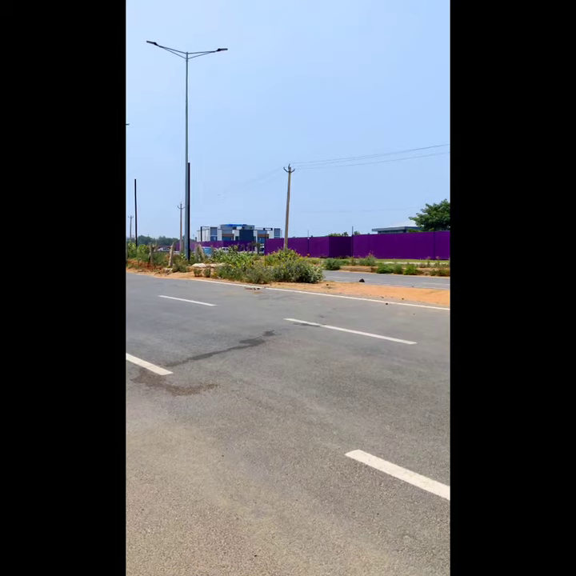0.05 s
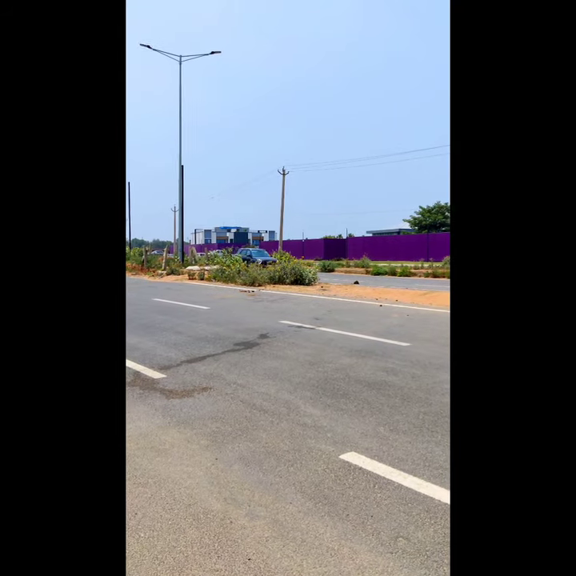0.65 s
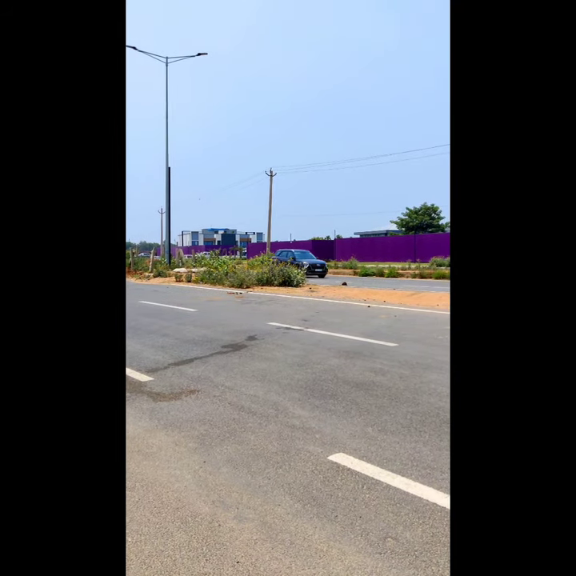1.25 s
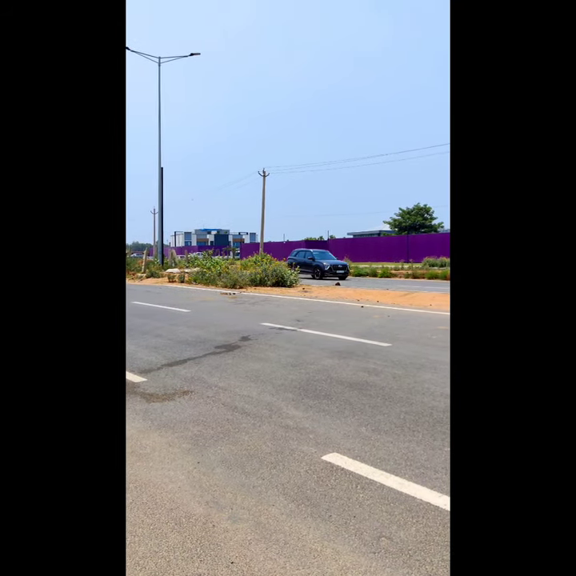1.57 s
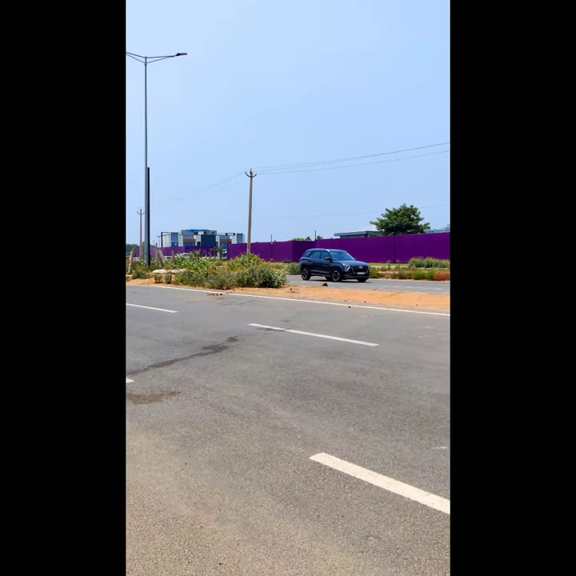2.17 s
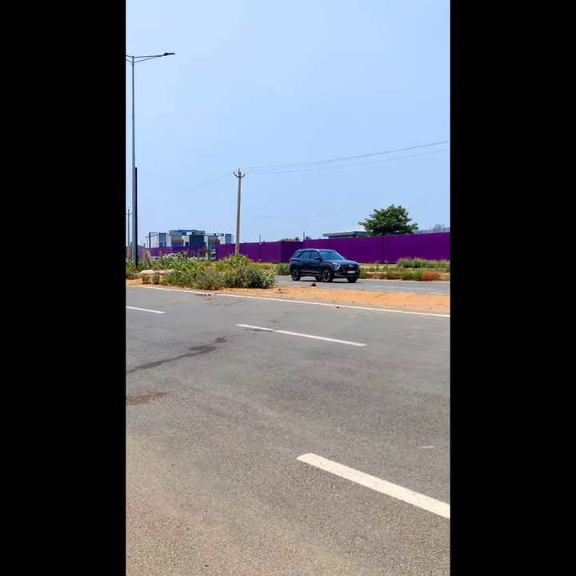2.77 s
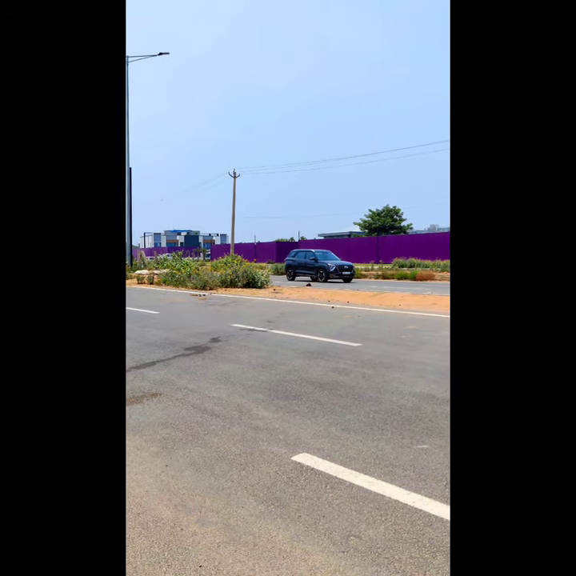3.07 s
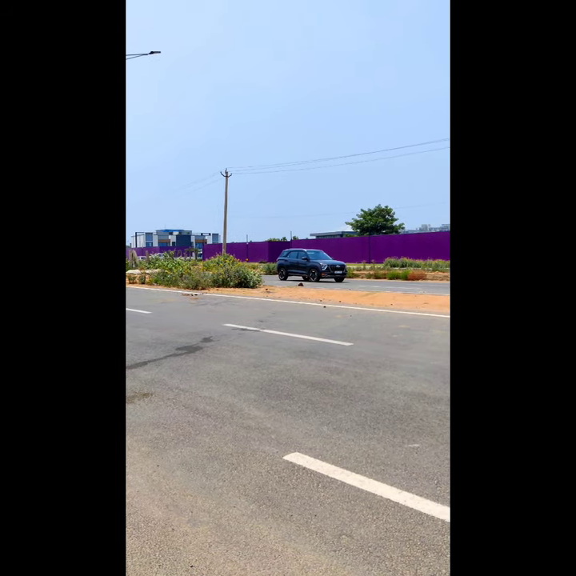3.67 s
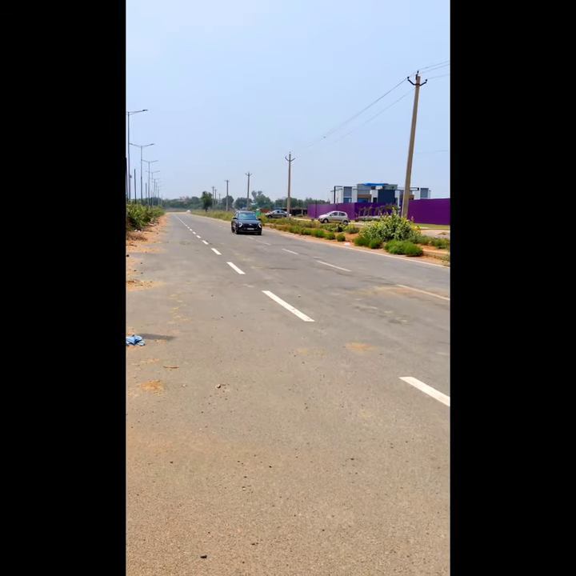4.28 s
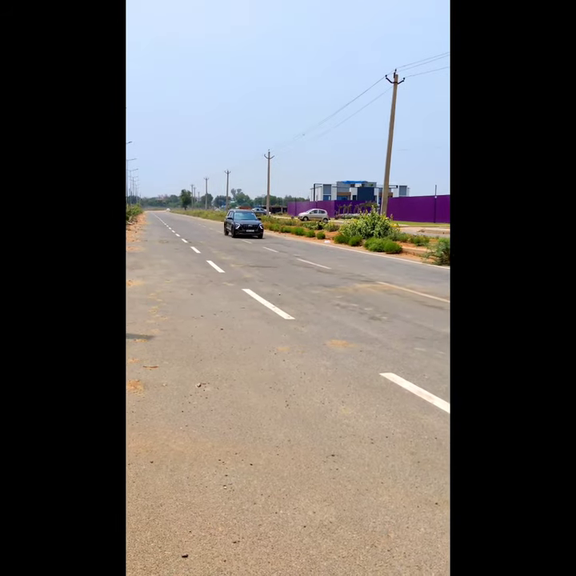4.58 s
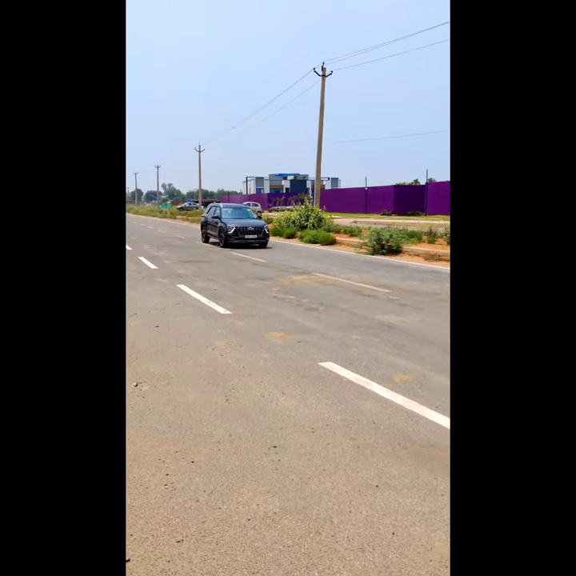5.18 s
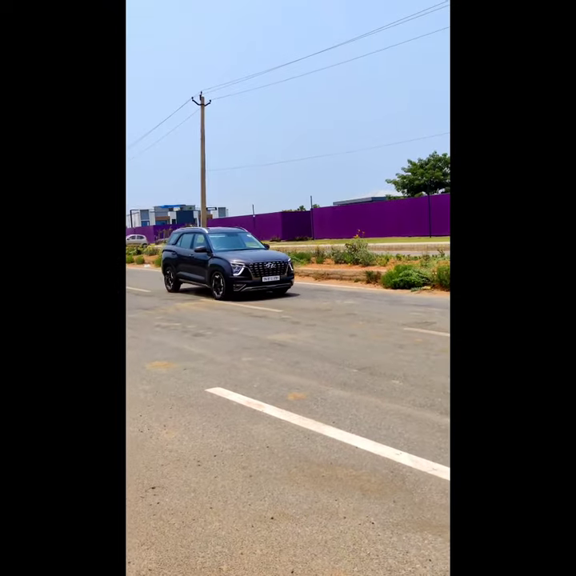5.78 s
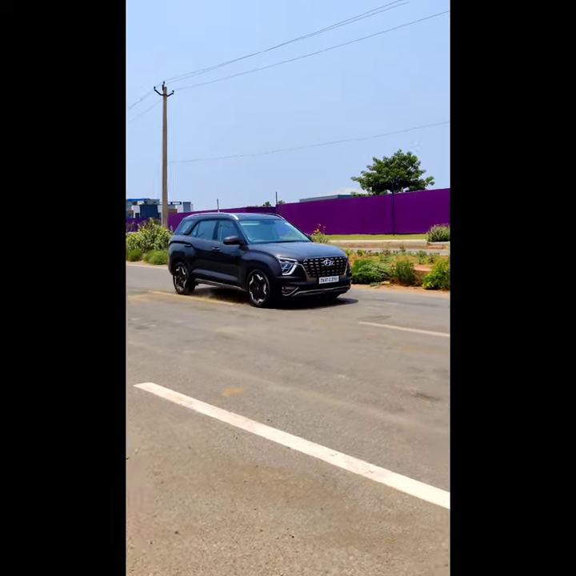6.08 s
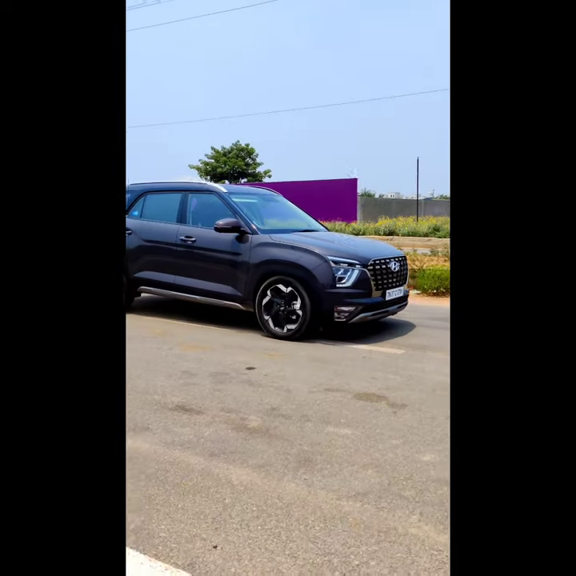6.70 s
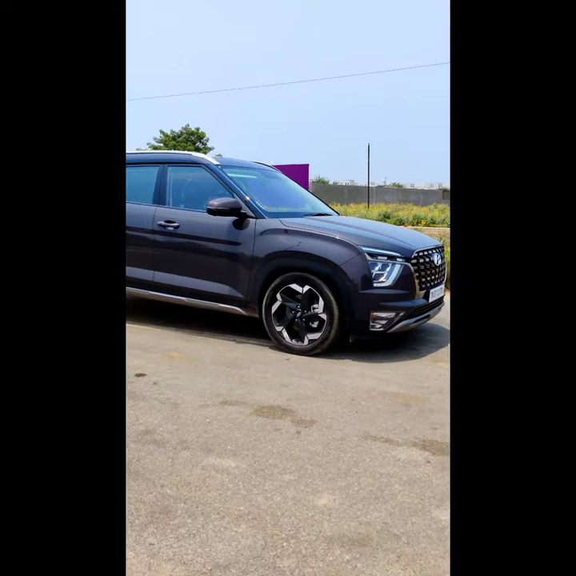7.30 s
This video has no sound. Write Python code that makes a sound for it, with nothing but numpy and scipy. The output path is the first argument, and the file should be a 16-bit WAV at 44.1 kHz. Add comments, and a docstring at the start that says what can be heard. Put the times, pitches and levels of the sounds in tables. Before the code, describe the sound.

Outdoors, with a light breeze on the microphone, tyres screech in uneven surges as a distant car brakes. The squeal stops briefly, leaving a low engine drone, soft scuffs and faint bird chirps. A second, rougher screech follows and draws near, creeping up in pitch while the engine slows. Faint grit crackles under the tyres and the wheels shudder as the car comes close.

```python
"""Tyres squeal as a car brakes hard twice on an open road, first far off, then rolling up close.
Stick-slip friction drives the tread near 800 Hz, surging at each grab of the brakes, while sliding
rubber rasps and hisses on the asphalt. In the second stop the engine note sinks, grit crackles and
the wheels judder. Between the stops the far engine growls and a small bird chirps over faint scuffs.
A light breeze rumbles on the two-port microphone that hears it all."""
import sys
import numpy as np
from scipy import signal
from scipy.fft import rfft, irfft, next_fast_len
from scipy.io import wavfile
from scipy.ndimage import uniform_filter1d, minimum_filter1d, map_coordinates

SR = 44100
rng = np.random.default_rng(int(sys.argv[2]) if len(sys.argv) > 2 else 0)


def store_pcm(level_fs):
    """Save levels as 16-bit WAV."""
    pcm = np.round(np.clip(level_fs, -1, 1) * 32767).astype(np.int16)
    wavfile.write(sys.argv[1], SR, np.atleast_2d(pcm).T)


N = 328545
TIME = np.arange(N) / SR
CLOCK = TIME[::64]  # coarse time for envelopes
START_S, SECOND_RUN_S = .078, 4.13


def undb(db):
    """Amplitude ratio of a level in decibels."""
    return np.exp(np.asarray(db) * (np.log(10) / 20))


def unit(x):
    """Normalisation to rms 1."""
    return x / np.sqrt(np.mean(np.abs(x) ** 2))


def curve(rows):
    """Linear interpolation, with rounded corners, of each column that follows time_s."""
    time_s, *columns = np.transpose(rows)
    return [uniform_filter1d(np.interp(TIME, np.sort(time_s), c), size=256) for c in columns]


def wander(hz):
    """Random modulation: noise of rms 1, low-passed at hz."""
    count = 32768
    freq = np.fft.rfftfreq(count, TIME[-1] / count)
    smooth = irfft(rfft(rng.standard_normal(count)) / (1 + (freq / hz) ** 2))
    return unit(np.interp(TIME, np.linspace(0, TIME[-1], count), smooth))


def gate(start, end, edge):
    """Trapezoidal window, with all times in seconds."""
    out, span = np.zeros(N), slice(max(int(start * SR), 0), int(end * SR))
    out[span] = np.clip((TIME[span] - start) / edge, 0, 1) * np.clip((end - TIME[span]) / edge, 0, 1)
    return out


def place(x, balance_db):
    """Amplitude panning by a level difference, left minus right."""
    return x * undb(np.array([balance_db, -balance_db]).reshape(2, -1) / 2)


def noise(spectrum, side_db, balance=((100, 0), (1000, 0))):
    """Partly coherent stereo noise of rms 1, falling 60 dB an octave beyond the ends of its spectrum."""
    size = next_fast_len(N)
    octave = np.log2(np.fft.rfftfreq(size, 1 / SR) + 1)
    hz, db = np.transpose(spectrum)
    beyond = np.abs(octave - np.clip(octave, np.log2(hz[0]), np.log2(hz[-1])))
    colour = undb(np.interp(octave, np.log2(hz), db) - 60 * beyond)
    mid, side = rfft(rng.standard_normal((2, size))) * colour
    port_hz, port_db = np.transpose(balance)
    balance_db = np.interp(octave, np.log2(port_hz), port_db)
    pair = place(mid + undb(side_db) * np.array([side, -side]), balance_db)
    return unit(irfft(pair, size)[:, :N])


# Still air over the fields: frequency_hz, density_db
AIR_SPECTRUM = [(650, -37), (1100, 1), (1460, -4.5), (2040, -2), (2150, -9), (2670, -12.5), (3700, -12.5),
                (4760, -15.5), (5270, -18), (6120, -17), (8140, -27.5), (10600, -54.5), (17900, -120)]

def air():
    """Ambient noise floor: a faint broadband hiss whose level drifts."""
    return undb(-57.5 + .8 * wander(4)) * noise(AIR_SPECTRUM, side_db=.5)


# Breeze on the microphone: time_s, level_db
BREEZE_LEVEL = [(.1, -37.5), (2.3, -42.5), (2.8, -36), (3.9, -37), (4.08, -23.5), (4.2, -46), (4.7, -40),
                (6.6, -32), (7.1, -28.5), (7.45, -27)]
# Its spectrum: frequency_hz, density_db
BREEZE_SPECTRUM = [(14, -7.5), (22, 6.5), (35, 1), (50, 3), (70, -8)]

def breeze():
    """Turbulent pressure: slow eddies reach each port partly on their own."""
    eddies = noise(BREEZE_SPECTRUM, side_db=-5, balance=[(20, -3), (70, -1)])
    return undb(curve(BREEZE_LEVEL)[0]) * eddies


# Bird chirps: start_s, first_pitch_hz, last_pitch_hz, level_db
CHIRPS = [(2.805, 4230, 4470, -69), (2.835, 4720, 4450, -71), (2.863, 5460, 4570, -57.5),
          (2.925, 3730, 3230, -65), (3.115, 4650, 4500, -69), (3.143, 5530, 4600, -58),
          (3.2, 3700, 3120, -63), (3.42, 5520, 4700, -61), (3.47, 3720, 3600, -68),
          (3.685, 4520, 4505, -70), (3.715, 5510, 4480, -58), (3.775, 3780, 3250, -66),
          (3.845, 4820, 4550, -69), (3.92, 4050, 4350, -67), (3.95, 4300, 4200, -70)]
# Softer twitter among them: time_s, level_db
TWITTER_LEVEL = [(3.2, -85), (3.38, -67), (3.52, -81), (3.65, -69), (3.8, -77), (3.96, -73), (4.06, -87)]

def bird():
    """Frequency-modulated whistles; scattering from bushes and fence adds an exponential tail."""
    chirp_s, scatter_decay_s, scatter_db = .037, .035, -2.5
    song = np.zeros(N)
    t = TIME[:int(chirp_s * SR)]
    fade = np.clip(np.minimum(t, chirp_s - t) / .008, 0, 1)
    waver = 1 + .01 * wander(200)
    for start, first_hz, last_hz, db in CHIRPS:
        span = slice(int(start * SR), int(start * SR) + len(t))
        hz = (first_hz + (last_hz - first_hz) * (t / chirp_s) ** 2) * waver[span]
        song[span] += undb(db) * fade * np.sin(2 * np.pi * np.cumsum(hz) / SR)
    twitter_hz = (4250 + 200 * wander(30)) * waver
    twitter_gain = undb(curve(TWITTER_LEVEL)[0]) * np.clip(wander(30) + .4, 0, 1)
    song += twitter_gain * np.sin(2 * np.pi * np.cumsum(twitter_hz) / SR)
    count = 8192
    decay = np.exp(-TIME[:count] / scatter_decay_s)
    tail = unit(rng.standard_normal((2, count)) * decay) / np.sqrt(count)
    return song + undb(scatter_db) * signal.fftconvolve(song[None], tail, axes=1)[:, :N]


# Scuffs in the lull: centre_s, length_s, low_hz, high_hz, level_db
SCUFFS = [(2.909, .11, 2600, 4200, -56), (3.099, 0.21, 2980, 5000, -59.5), (3.648, .12, 2800, 5000, -63)]

def scuffs():
    """Band-limited noise, swelling and fading under triangular envelopes."""
    out = np.zeros((2, N))
    for centre, length, low_hz, high_hz, db in SCUFFS:
        start, count = int((centre - length / 2) * SR), int(length * SR)
        band = signal.butter(2, [low_hz, high_hz], "bandpass", fs=SR, output="sos")
        mid, side = signal.sosfilt(band, rng.standard_normal((2, count)))
        scuff = unit(mid + undb(-3) * np.array([side, -side]))
        out[:, start:start + count] += undb(db) * np.bartlett(count) * scuff
    return out


# Drone of the distant car, and roll of the near tyres: time_s, level_db
DRONE_LEVEL = [(.1, -29), (.6, -33), (1.2, -29.5), (1.6, -35.5), (2.1, -30.5), (2.55, -34.5), (2.7, -27.5),
               (3.2, -30), (3.45, -31.5), (3.62, -36), (3.82, -32.5), (4.12, -33.5)]
NEAR_ROLL_LEVEL = [(4.15, -34.5), (4.6, -34.5), (5.1, -38.5), (5.7, -34.5), (6.2, -38.5), (7.0, -32.5),
                   (7.45, -39.5)]
# Spectra of the drone, the far tyres and the near tyres: frequency_hz, density_db
DRONE_SPECTRUM = [(65, -47.5), (110, -3), (183, 0.5), (231, -9.5), (300, -1.5), (358, -8), (396, -15),
                  (464, -9.5), (550, -21), (614, -14.5), (692, -23), (846, -36.5), (898, -28.5),
                  (925, -30.5), (1200, -46.5), (1560, -82.5), (2640, -120)]
FAR_ROLL_SPECTRUM = [(550, -8), (800, 6), (1000, -14), (1300, -19.5), (1700, -18), (2400, -28)]
NEAR_ROLL_SPECTRUM = [(140, 8), (175, 10.5), (220, 7), (275, -3.5), (330, -2), (400, -9.5), (520, -7),
                      (620, 2), (780, 2), (1050, -5.5), (1400, -12), (1900, -20), (2500, -31)]

def road(near):
    """Rolling contact radiates broadband noise; near (0 to 1) crossfades from the far run to the close."""
    drone = undb(curve(DRONE_LEVEL)[0]) * noise(DRONE_SPECTRUM, side_db=-10)
    far_db = np.interp(TIME, [.3, 2.4, 3.1, 4.1], [-36, -38, -44, -55.5])
    far_roll = undb(far_db) * noise(FAR_ROLL_SPECTRUM, side_db=2)
    near_roll = undb(curve(NEAR_ROLL_LEVEL)[0]) * noise(NEAR_ROLL_SPECTRUM, side_db=-22)
    return (1 - near) * (drone + far_roll) + near * near_roll


# Far engine, dying down under braking and picking up as the car turns: time_s, firing_hz, level_db
GROWL = [(.15, 140, -32.5), (.5, 142, -42), (.85, 143, -34.5), (1.25, 148.2, -39), (1.6, 150, -50),
         (2.55, 152, -49.5), (2.7, 154.7, -32.5), (2.76, 152.8, -31), (2.82, 152.3, -28.5),
         (2.92, 145.7, -31.5), (3.02, 155.5, -29.5), (3.1, 159.5, -36), (3.18, 166.8, -30),
         (3.3, 161.4, -35.5), (3.4, 158, -43.5), (3.62, 149.7, -46), (3.8, 159.8, -36.5), (4.0, 159.6, -48),
         (4.1, 161.5, -32), (4.14, 160, -41.5)]
# Its harmonics: order, relative_db
GROWL_ORDERS = [(1, -2.5), (2, 0.5), (3, -4.5), (4, -16.5)]

def far_engine():
    """Uneven firings give a rough harmonic series whose orders flutter in level and phase on the way."""
    hz, db = curve(GROWL)
    phase = 2 * np.pi * np.cumsum(hz * (1 + .03 * wander(39))) / SR
    note = sum(undb(order_db + 3.5 * wander(40)) * np.sin(order * phase + .6 * wander(35))
               for order, order_db in GROWL_ORDERS)
    return undb(db) * unit(note)


# Near engine on the overrun: time_s, firing_hz
ENGINE_RATE = [(4.13, 172), (4.5, 158), (5.0, 138.5), (5.4, 128), (6.0, 121), (6.5, 119), (7.0, 116),
               (7.45, 113)]
# Its strength: time_s, level_db
ENGINE_LEVEL = [(4.13, -37.5), (4.65, -30.5), (5.1, -33.5), (5.6, -34.5), (6.2, -31), (6.8, -32),
                (7.2, -31), (7.45, -28)]
# Its harmonics: order, relative_db
ENGINE_ORDERS = [(1, -3), (2, -16.5), (3, -24.5), (4, -18), (5, -22.5)]

def near_engine():
    """Harmonics of the firing rate sink as the car slows; upper orders and mutter emerge close by."""
    phase = 2 * np.pi * np.cumsum(curve(ENGINE_RATE)[0] * (1 + .024 * wander(42.6))) / SR
    muffle_db = np.interp(TIME, [5.5, 6.3], [-13, 0])
    note = sum(undb(db + 2.4 * wander(48) + (order > 2) * muffle_db) * np.sin(order * phase)
               for order, db in ENGINE_ORDERS)
    puffs = unit(1 + .45 * np.cos(phase))  # one puff of noise per firing
    breath = noise([(180, -9.5), (330, -2), (650, -2.5)], side_db=-12.5)
    mutter = undb(2.4 * muffle_db - 11.5) * puffs * breath
    return (unit(note) + mutter) * undb(curve(ENGINE_LEVEL)[0])


# Rumble of wheels and suspension: time_s, level_db
RUMBLE_LEVEL = [(.1, -39), (2.3, -33), (2.8, -40), (4.3, -40.5), (4.8, -39.5), (5.6, -41.5), (6.4, -34.5),
                (6.9, -31), (7.3, -32.5), (7.45, -49.5)]
# Its spectrum: frequency_hz, density_db
RUMBLE_SPECTRUM = [(45, -9), (62, -9), (79, 0.5), (100, -6), (120, -6)]
# Judder as the brakes grab: centre_s, pitch_hz, length_s, level_db
JUDDER = [(6.015, 206.8, 0.14, -30.5), (6.325, 81.1, 0.14, -33), (6.49, 81.26, .08, -27),
          (6.569, 79, 0.1, -26.5), (6.838, 146, 0.12, -30.5), (6.879, 77.14, 0.23, -25.5),
          (6.981, 164.8, 0.12, -23.5), (7.078, 81, 0.14, -24), (7.216, 135, 0.05, -23.5),
          (7.263, 174.4, 0.13, -27)]

def wheels(rasp_gain):
    """Forced vibration: rolling and each skid shake the suspension, which shudders near the stop."""
    gain = np.hypot(undb(curve(RUMBLE_LEVEL)[0]), undb(-9) * rasp_gain)
    out = gain * noise(RUMBLE_SPECTRUM, side_db=-30.5)
    uneven_time = np.cumsum(1 + .07 * wander(40)) / SR
    for centre, hz, length, db in JUDDER:
        span = slice(int((centre - length / 2) * SR), int((centre + length / 2) * SR))
        shudder = np.sin(2 * np.pi * hz * uneven_time[span])
        window = 2 * np.bartlett(len(shudder))  # mean of 1
        out[:, span] += undb(db) * window * shudder
    return out


# Grit crunching under the tread: time_s, level_db
GRIT_LEVEL = [(5.0, -88.5), (5.6, -74), (6.0, -75.5), (6.8, -68), (7.45, -61.5)]
# Its spectrum: frequency_hz, density_db
GRIT_SPECTRUM = [(6000, 5), (8000, 4), (10500, 1), (12000, -4), (14000, -14.5), (15000, -19.5)]

def grit():
    """Impulsive noise: sand crackles under the near tyres and two stones snap out."""
    crackle = unit(undb(5 * wander(500) + 3 * wander(8)))
    snaps = sum((TIME > start) * np.exp(-np.abs(TIME - start) / .003) for start in (5.25, 6.648))
    stone_db = np.interp(TIME, [5.2, 6.6], [-63, -53])  # louder as the car nears
    envelope = undb(curve(GRIT_LEVEL)[0]) * crackle + undb(stone_db) * snaps
    return envelope * noise(GRIT_SPECTRUM, side_db=-1)


# Instants at which the tyre bites: centre_s, half_width_s, depth_db
BITES = [(0.521, 0.0072, -14), (0.69, 0.0096, -11.5), (0.95, 0.0041, -15.5), (1.513, 0.01, -16.5),
         (2.198, .01, -6.5), (4.539, 0.0091, -6), (5.241, 0.012, -3), (5.515, .012, -4), (6.372, 0.011, -9),
         (6.866, 0.017, -9)]

def choke():
    """A moment of grip interrupts stick-slip: Gaussian dips in the level of the squeal."""
    centre, half_width, db = np.transpose(BITES)[:, :, None]
    dips_db = np.sum(db * np.exp(-((CLOCK - centre) / half_width) ** 2), axis=0)
    return np.interp(TIME, CLOCK, undb(dips_db))


# Skids of the leading tyre, one per grab of the brakes:
# start_s, length_s, pitch_hz, glide_hz, squeal_db, roughness, rasp_level_db, hiss_level_db
GRABS = [ (0.057, 0.126, 768, 1, -14.5, 0.98, -29.5, -45.5),
         (0.188, .035, 754, -1, -11.5, 0.74, -30, -53.5), (0.462, 0.16, 739, 2.5, -17, 0.6, -41, -60.5),
         (0.636, 0.046, 757, 2, -14.5, 0.53, -32, -51.5), (0.698, .13, 759, -1.5, -12.5, 0.56, -40, -51),
         (0.826, .115, 758.5, 9.5, -11, 0.33, -34.5, -53), (0.947, 0.15, 754.4, 3, -15, 0.48, -39.5, -53),
         (1.199, 0.056, 775.7, -1.5, -16.5, 0.34, -41, -52.5),
         (1.274, 0.05133, 906, 21, -19.5, 0.4, -32.5, -44),
         (1.322, 0.03045, 849, -34, -10.5, 0.24, -28.5, -45),
         (1.352, 0.051, 771, -2, -13, 0.41, -31.5, -49), (1.661, 0.06815, 778, 2, -15, 0.67, -37, -50),
         (1.961, 0.025, 748, -6, -15, 0.47, -36.5, -55), (1.993, 0.02487, 764.4, 0, -19, 0.36, -44, -66),
         (2.07, 0.1054, 830.5, 18.5, -17.5, 0.55, -38, -51.5),
         (2.205, 0.039, 788, -1, -21, 0.36, -45.5, -68), (2.443, 0.024, 795, 7.5, -22, 0.6, -47, -61),
         (2.466, 0.026, 845, 34.5, -15.5, 0.36, -35.5, -49.5),
         (4.419, .077, 755, -2, -12.5, 0.81, -26.5, -47.5),
         (4.645, .15, 746.3, 20.5, -12, 0.84, -25.5, -54),
         (4.785, .125, 795.5, 71.5, -13.5, 1.08, -25.5, -42.5),
         (4.974, .1, 837, -63.5, -14.5, 0.2, -46, -56), (5.065, 0.063, 757.8, -4, -11, 0.27, -30.5, -51),
         (5.134, 0.0919, 790.4, 13, -9.5, 1.12, -23, -40.5), (5.258, .13, 764.5, 1, -10, 0.45, -31.5, -52),
         (5.399, .056, 763, 1, -12, 0.78, -25, -41.5), (5.472, 0.037, 779.5, 0, -14, 0.94, -28.5, -47),
         (5.522, .135, 770.2, 3, -12.5, 0.68, -39, -66.5), (5.792, .16, 802, 0.5, -14.5, 0.82, -31, -42.5),
         (5.966, 0.056, 788.6, 32.5, -9, 0.63, -26.5, -40), (6.011, .098, 852, 8.5, -7.5, .6, -20.5, -35.5),
         (6.202, .09, 846.7, 7.5, -11.5, 0.62, -29, -38.5),
         (6.469, .082, 862.4, 9.5, -11.5, 0.84, -25, -37.5), (6.563, .1, 931, 48, -15, 0.14, -54.5, -48),
         (6.659, .07, 945, -42.5, -11, 0.1, -30.5, -36.5),
         (6.888, 0.069, 857, -40.5, -10, 0.55, -31.5, -40.5), (7.07, 0.05, 863.4, -3, -5, 0, -25.5, -39.5),
         (7.276, .042, 865.5, -2.5, -10, 0.23, -28, -41.5), ]
ATTACK_S, RELEASE_S = .0232, .016  # a squeal's rise time and decay time constant

def sum_grabs(values, attack_s=ATTACK_S, release_s=RELEASE_S):
    """Power summation: each grab's value is weighted by its squared rise, hold and decay."""
    start, length = np.transpose(GRABS)[:2, :, None]
    rise = np.clip(.5 + (CLOCK - start - ATTACK_S / 2) / attack_s, 0, 1)
    fall = np.exp(-np.clip((CLOCK - start - length + release_s - RELEASE_S) / release_s, 0, 20))
    return np.interp(TIME, CLOCK, np.sum(values * (rise * fall) ** 2, axis=0))


# Light sliding between grabs, one table per stop: time_s, squeal_db, pitch_hz, roughness
LIGHT_SLIDE = [
    [(.25, -21.5, 784, .75), (.4, -47, 756, .7), (.7, -26.5, 762, 0.53), (1.15, -20.5, 756.3, 0.28),
     (1.5, -25.5, 774.6, 0.4), (1.64, -23, 808.3, .3), (1.8, -23.5, 839.2, 0.43), (2.04, -36, 813.7, 0.34),
     (2.31, -44.5, 852.3, 0.33), (2.43, -54.5, 797, 0.51), (2.5, -24, 866, .4), (2.555, -27.5, 854, 0.34),
     (2.6, -38.5, 863, 0.4)],
    [(4.32, -36, 725, 0.59), (4.39, -18.5, 730.2, 0.64), (4.54, -21.5, 745, 0.85),
     (4.62, -15.5, 734.3, 0.86), (4.9, -16, 749.5, 0.78), (5.02, -23, 754, 0.5), (5.15, -15.5, 759.7, 0.68),
     (5.48, -15.5, 774.3, 0.72), (5.72, -23.5, 776.1, 0.64), (6.36, -20, 822, 0.52),
     (6.46, -18.5, 829.3, 0.59), (6.86, -20.5, 825.8, 0.47), (7.03, -32, 862, 0.27),
     (7.17, -14.5, 847.6, 0.37), (7.38, -38.5, 836.5, 0.47)],
]
# Scrubbing beneath it: time_s, rasp_level_db, hiss_level_db
SCRUB_LEVELS = [(.1, -47, -61.5), (1.2, -48, -61.5), (1.7, -46, -55), (2.55, -76, -55.5),
                (2.66, -47.5, -56), (4.15, -60, -61.5), (4.32, -41.5, -65), (4.7, -32.5, -50),
                (5.7, -27.5, -46), (6.35, -43.5, -49), (6.8, -33.5, -46.5), (7.0, -35.5, -44),
                (7.45, -37, -46)]

def braking():
    """Grabs and light sliding add in power; pitch and roughness are their power-weighted means."""
    slide_db, slide_hz, slide_rough = curve(np.vstack(LIGHT_SLIDE))
    scrub_rasp_db, scrub_hiss_db = curve(SCRUB_LEVELS)
    start, length, hz, glide_hz, db, rough, rasp_db, hiss_db = np.transpose(GRABS)[:, :, None]
    slide_power = np.clip(1 - sum_grabs(1), 0, 1) * undb(slide_db) ** 2
    grab_power = undb(db) ** 2
    power = slide_power + sum_grabs(grab_power)
    progress = np.clip((CLOCK - start) / (length + ATTACK_S), 0, 1)
    arch = np.sin(np.pi * progress) - np.pi / 4  # mid-grab the pitch crests and the rasp eases
    grab_hz = hz + 16.04 * arch + glide_hz * (progress - .5)
    pitch_hz = (slide_power * slide_hz + sum_grabs(grab_power * grab_hz)) / power
    roughness = (slide_power * slide_rough + sum_grabs(grab_power * rough)) / power
    rasp_power = sum_grabs(undb(rasp_db - 3.5 * arch) ** 2, attack_s=.044, release_s=.013)
    rasp_gain = np.sqrt(undb(scrub_rasp_db) ** 2 + rasp_power)
    # the hiss swells in a bell just after the middle of each grab
    crest_s, width_s = start + length / 2 + .0058, .0063 + .29 * length
    swell = 1 / np.cosh(np.clip((CLOCK - crest_s) / width_s, -20, 20))
    hiss_power = np.interp(TIME, CLOCK, np.sum((undb(hiss_db) * swell) ** 2, axis=0))
    hiss_gain = np.sqrt(undb(scrub_hiss_db) ** 2 + hiss_power)
    return pitch_hz, np.clip(roughness, 0, 1), np.sqrt(power) * choke(), rasp_gain, hiss_gain


# Rasp of rubber, and its hiss far off, approaching (dulled by air) and close: frequency_hz, density_db
RASP_SPECTRUM = [(620, -19.5), (1050, -2), (1220, -14), (1290, -6), (1340, -14), (1490, -3), (1700, -3.5),
                 (2000, -10.5), (2250, -20.5), (3120, -26), (5280, -120)]
FAR_HISS = [(1290, -17), (2200, 0.5), (2520, -7.5), (2710, -13), (2980, -8), (3300, -13.5), (3820, -16),
            (4250, -12), (4840, -12.5), (5370, -18), (7180, -24.5), (8140, -31.5), (10600, -60),
            (17900, -120)]
APPROACH_HISS = [(1800, -9), (2300, -7), (2560, 5.5), (2850, -9), (3200, -3), (3480, -2), (3900, -6.5),
                 (4800, -7.5), (5800, -17), (7400, -19.5), (8300, -35.5), (9500, -45.5)]
CLOSE_HISS = [(1800, 1), (2100, -5.5), (2300, -11.5), (2560, 2), (2700, -8.5), (2900, -2), (3150, -9),
              (3500, -2.5), (3850, -6.5), (4900, -8), (5900, -13), (7400, -17), (8100, -28), (9500, -41.5)]
# How the two ports hear the near car: frequency_hz, left_minus_right_db
PORT_BALANCE = [(500, -2), (950, -17.5), (1120, 13), (1380, -3.5), (1700, -2.5), (2200, 3.5), (2900, 3),
                (3600, -1.5), (6000, 0)]

def scrubbing(hz, swing, rasp_gain, hiss_gain):
    """Friction noise: rubber rasps and hisses on asphalt, hardest where the tread's swing is widest."""
    near = TIME > SECOND_RUN_S
    modulation = unit(14 + swing) * undb(1.1 * wander(62))
    near_rasp = noise(RASP_SPECTRUM, side_db=-9.5, balance=PORT_BALANCE)
    rasp = np.where(near, near_rasp, noise(RASP_SPECTRUM, side_db=-10.5))
    # resampling makes the rasp's spectrum rise with the squeal
    reference_hz, follow_share = 794, .7
    travel = np.cumsum(1 + follow_share * (hz / reference_hz - 1))
    rasp = np.array([map_coordinates(port, [travel], order=1, mode="mirror") for port in rasp])
    close = np.interp(TIME, [4.8, 6], [0, 1])
    near_hiss = np.sqrt(close) * noise(CLOSE_HISS, side_db=-6, balance=PORT_BALANCE)
    near_hiss += np.sqrt(1 - close) * noise(APPROACH_HISS, side_db=-2, balance=PORT_BALANCE)
    hiss = np.where(near, near_hiss, noise(FAR_HISS, side_db=-4))
    sliding = gate(0, 2.66, .081) + gate(SECOND_RUN_S, 8, .0058)
    return sliding * modulation * (undb(-1.5) * rasp_gain * rasp + undb(2) * hiss_gain * hiss)


def tread(hz, jitter, flutter_db):
    """One rubber patch in stick-slip, as a phasor; road grain modulates its rate and amplitude."""
    rate = hz * (1 + jitter * (wander(40.4) + .44 * wander(215)))
    return undb(flutter_db * wander(66)) * np.exp(2j * np.pi * np.cumsum(rate) / SR)


def overtone(phasor, order):
    """Harmonic generation: the snap of each slip adds a multiple of the tread's rate."""
    return unit(np.abs(phasor) * np.cos(order * np.angle(phasor)))


# Squeals of another wheel: start_s, length_s, first_pitch_hz, last_pitch_hz, level_db, octave_relative_db
SECOND_TYRE = [(1.225, 0.079, 824, 889, -23.5, -23), (1.265, 0.15, 758.4, 816, -21, -25),
               (1.684, 0.061, 770, 759, -19.5, -19.5), (2.28, 0.074, 915, 926, -42.5, -17),
               (4.363, 0.11, 660, 683, -23, -12), (4.58, 0.074, 700, 711, -22, -13),
               (4.816, .026, 715, 723, -16, -8), (4.848, 0.11, 860, 893, -24, -13.5),
               (5.278, 0.026, 740, 724, -20, -9), (5.344, 0.02, 725, 747, -15, -19),
               (4.692, 0.12, 736.4, 763.6, -23.5, -13), (4.926, 0.21, 705.6, 714.7, -16.5, -16.5),
               (5.534, 0.14, 774.4, 793, -22, -13), (5.74, .09, 750, 758.5, -18.5, -10),
               (5.889, 0.16, 760, 780.8, -14.5, -14), (6.645, .1, 822, 792, -17.5, -21),
               (7.004, .32, 980, 971, -33.5, -24)]

def second_tyre():
    """Stick-slip of a single patch gives short, cleaner squeals that glide on a note of their own."""
    out = np.zeros(N)
    # removing the carrier leaves only the road grain's modulation
    grain = tread(800, jitter=.01, flutter_db=1.5) * np.exp(-2j * np.pi * 800 * TIME)
    for start, length, first_hz, last_hz, db, octave_db in SECOND_TYRE:
        end = start + length
        span = slice(int(start * SR), int(end * SR))
        hz = np.interp(TIME[span], [start, end], [first_hz, last_hz])
        patch = grain[span] * np.exp(2j * np.pi * np.cumsum(hz) / SR)
        tone = unit(patch.real) + undb(octave_db) * overtone(patch, order=2)
        out[span] += undb(db) * gate(start, end, edge=.0073)[span] * tone
    return place(out, balance_db=-1)


# Bearing of the squeal's fundamental: time_s, left_minus_right_db
BEARING = [(.08, -3.5), (.8, -3.5), (1.3, -5), (2.5, -6), (4.4, -3), (5.2, -2.5), (5.7, -5.5), (6.1, 1),
           (6.5, 0.5), (6.67, -6.5), (6.9, 2), (7.1, -1.5), (7.45, -2.5)]
# Strength of the squeal's octave against the rasp gain: time_s, relative_db
OCTAVE_RE_RASP = [(.1, -8), (.85, -6.5), (1.3, -3.5), (2.5, -1.5), (4.5, -4), (5.2, -22.5), (5.7, -2.5),
                  (6.05, 1.5), (6.3, 5.5), (6.55, -1.5), (6.8, -12.5), (7.15, -1), (7.45, -22)]

def leading_tyre(hz, rough, squeal_gain, rasp_gain, hiss_gain):
    """Stick-slip oscillation: the tread's middle sings and, in a rough slide, beats with its shoulders."""
    middle = tread(hz, jitter=.003 + .015 * rough, flutter_db=1 + 1.3 * rough)
    inner = .55 * rough * tread(hz * (1 - .058 * rough), jitter=.02, flutter_db=3)
    outer = .48 * rough * tread(hz * (1.04 + .065 * rough), jitter=.032, flutter_db=3)
    rubber = middle + inner + outer
    # friction limits the common swing, so only the fast beats are left
    rubber /= np.sqrt(uniform_filter1d(np.abs(rubber) ** 2, int(.06 * SR)))
    tone = place(squeal_gain * unit(rubber.real), curve(BEARING)[0])
    # each patch snaps on its own, so the octave is three wavering strands that come and go
    strands = sum(share * undb(3.5 * wander(22)) * np.real(patch ** 2) / (np.abs(patch) + 1e-9)
                  for share, patch in ((1, middle), (1.2, inner), (.9, outer)))
    octave_gain = np.hypot(undb(curve(OCTAVE_RE_RASP)[0]) * rasp_gain, undb(-28.5) * squeal_gain)
    octave = place(octave_gain * unit(strands), balance_db=-2)
    third = undb(-49) * squeal_gain * overtone(rubber, order=3)
    sliding = gate(0, 2.6, .012) + gate(4.31, 8, .061)
    return sliding * (tone + octave + third) + scrubbing(hz, np.abs(rubber), rasp_gain, hiss_gain)


def scene():
    """Superposition of all sources in the open air, with no walls near."""
    hz, rough, squeal_gain, rasp_gain, hiss_gain = braking()
    tyres = leading_tyre(hz, rough, squeal_gain, rasp_gain, hiss_gain) + second_tyre()
    near = gate(SECOND_RUN_S, 8, .0076)
    rolling = grit() + wheels(rasp_gain) + road(near)
    still_air = air()
    engine = (1 - near) * far_engine() + near * near_engine()
    background = still_air + breeze() + scuffs() + bird()
    return (background + engine + rolling + tyres) * gate(START_S, 8, .0013)


# Phase difference between the microphone's ports: frequency_hz, left_lead_rad
PORT_PHASE = [(300, -0.1), (760, -0.33), (880, -.25), (1030, 0.93), (1250, 0.57), (1550, 0.97),
              (1950, 0.64), (2330, -0.62), (2700, -0.5), (3360, -0.24), (4000, -0.51), (8000, -.4)]

def record(dry):
    """Spaced ports shift the phase; a limiter holds the peaks down and a low-pass cuts the top."""
    ceiling, hold, top_hz = .88, int(.004 * SR), 15000
    size = next_fast_len(N + 4096)
    lead = np.interp(np.fft.rfftfreq(size, 1 / SR), *np.transpose(PORT_PHASE))
    heard = irfft(rfft(dry, size) * np.exp(.5j * np.array([lead, -lead])), size)[:, :N]
    peak = -minimum_filter1d(-np.abs(heard).max(axis=0), 2 * hold)
    gain = uniform_filter1d(np.minimum(1, ceiling / (peak + 1e-9)), hold)
    lowpass = signal.ellip(8, .2, 70, top_hz, fs=SR, output="sos")
    return signal.sosfilt(lowpass, heard * gain)


dry = scene()
out = record(dry)
store_pcm(out)
```